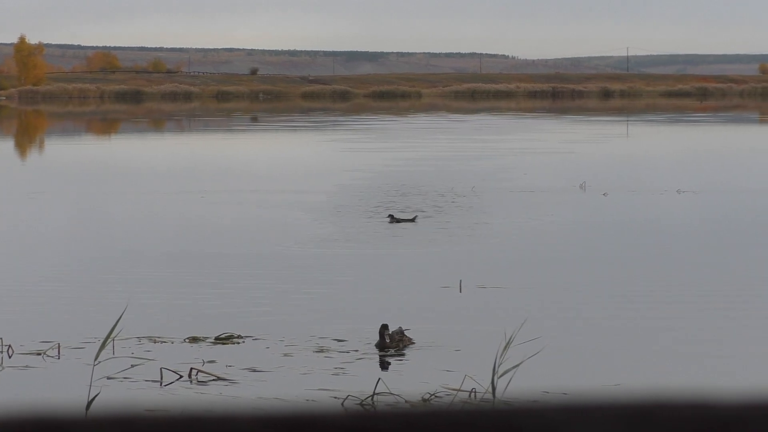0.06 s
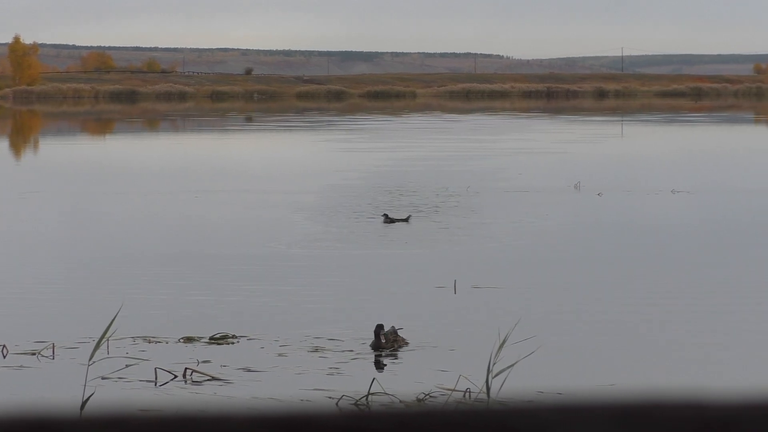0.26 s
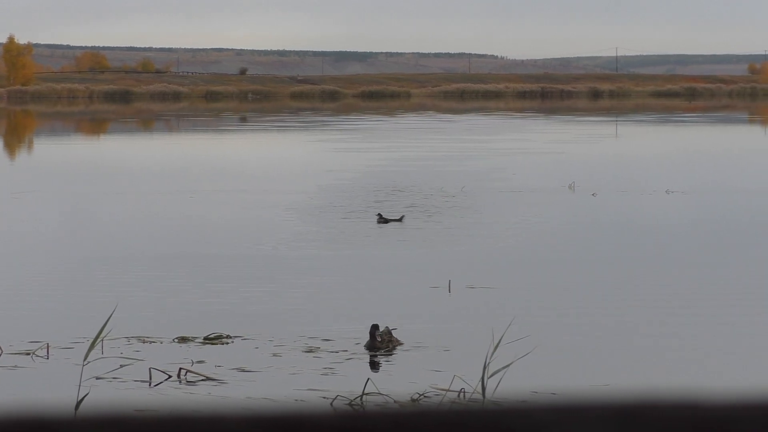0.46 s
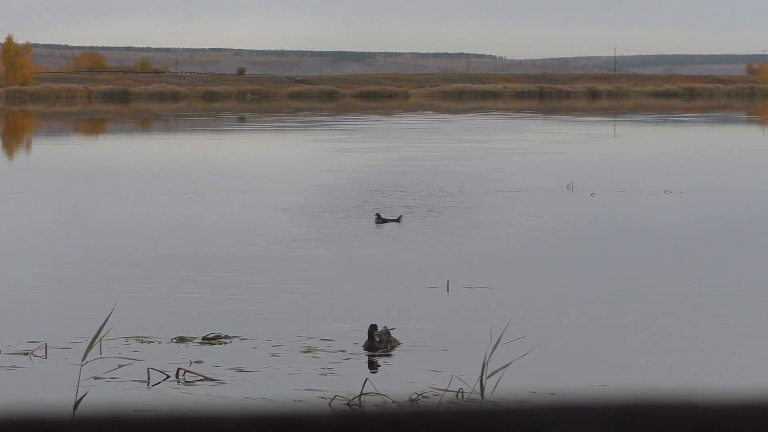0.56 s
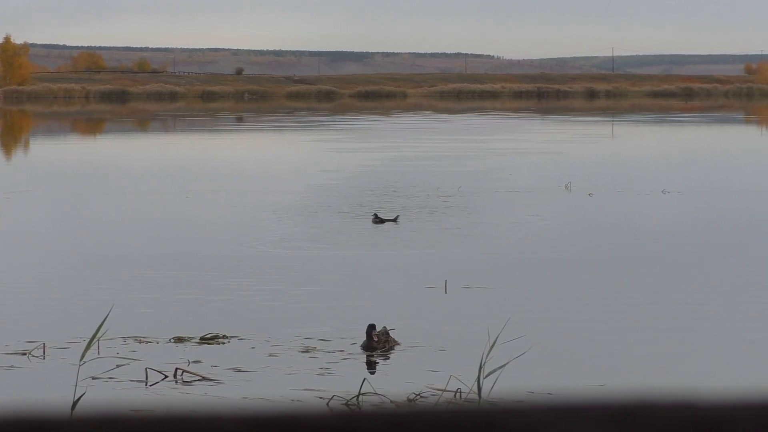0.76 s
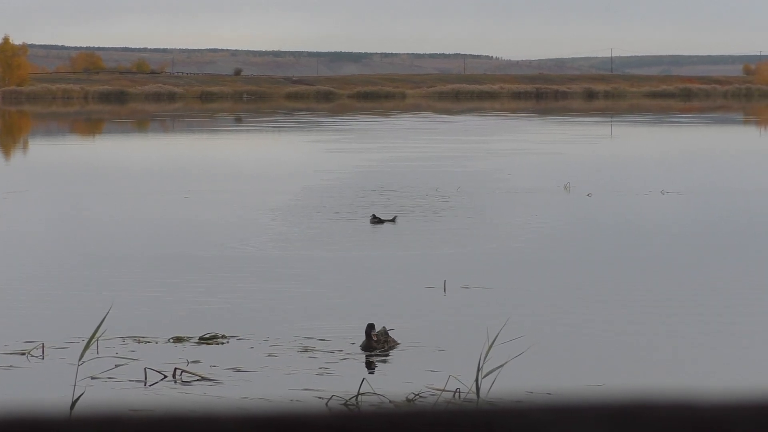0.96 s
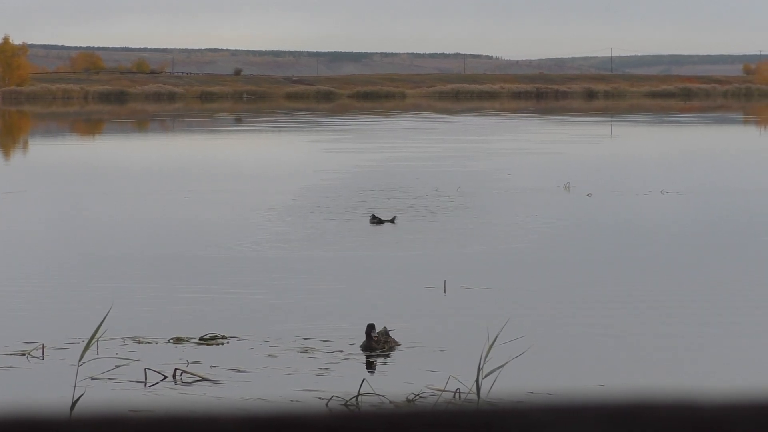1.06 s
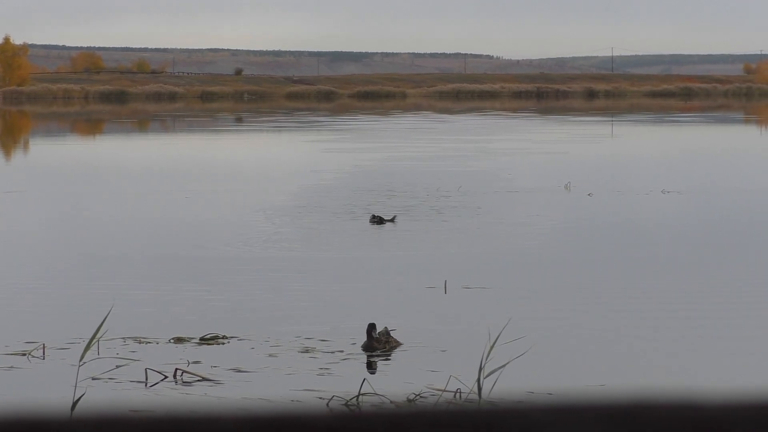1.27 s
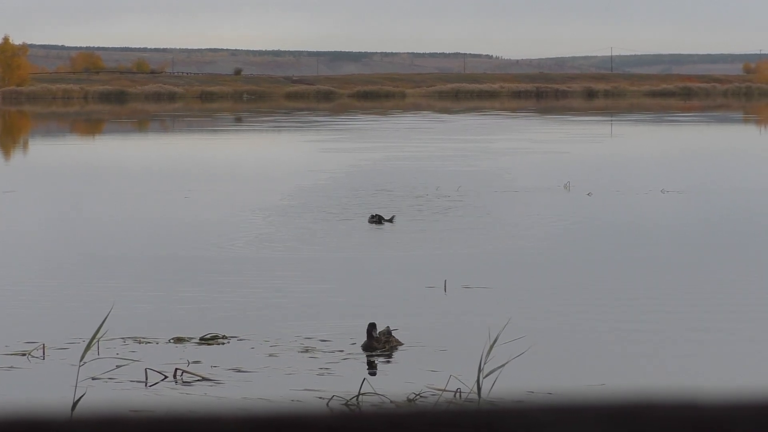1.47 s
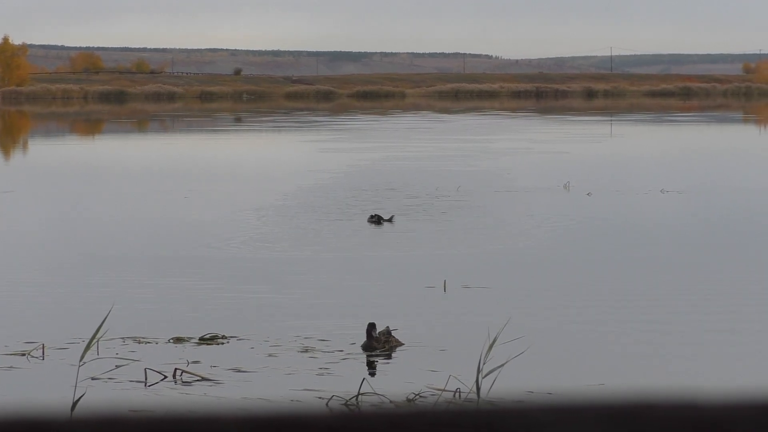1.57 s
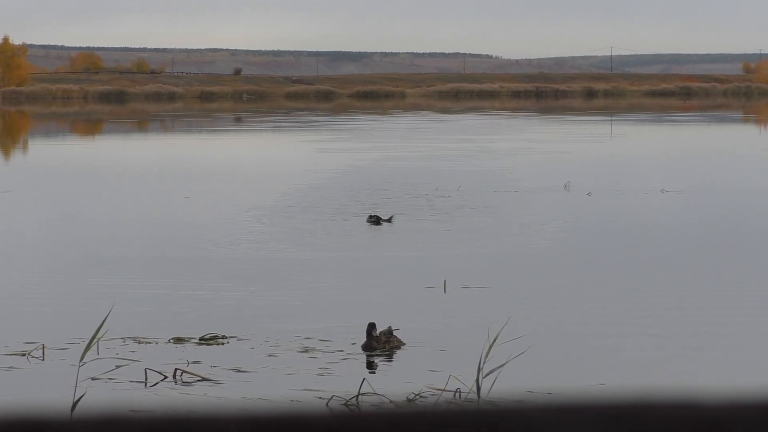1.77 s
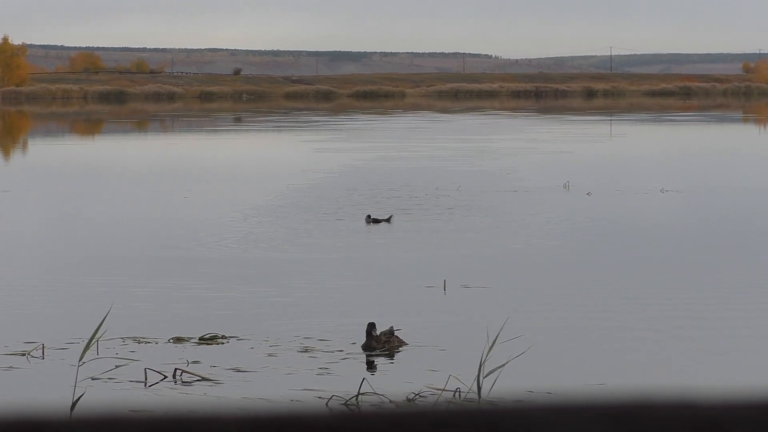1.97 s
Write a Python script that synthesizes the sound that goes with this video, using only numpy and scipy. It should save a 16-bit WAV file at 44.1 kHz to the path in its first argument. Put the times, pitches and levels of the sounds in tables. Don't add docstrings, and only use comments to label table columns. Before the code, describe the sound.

A duck gives two loud, buzzy nasal quacks, each a third of a second and rising in pitch, at 0.25 and 1.22 seconds. A very faint grunt precedes them at the start. Gear knocks and rattles beside the microphone from 0.9 to 1.25, cloth rustles from 1.6, a sharp double-click snap lands at 1.78, and a faint touch at 1.96. Soft air hiss and lapping water lie beneath, outdoors.

```python
import sys
import numpy as np
from scipy import signal
from scipy.fft import rfft, irfft
from scipy.io import wavfile
from scipy.ndimage import uniform_filter1d, minimum_filter1d

SR = 44100
rng = np.random.default_rng(int(sys.argv[2]) if len(sys.argv) > 2 else 0)


def pcm_store(signal):
    levels = np.round(np.clip(np.atleast_2d(signal), -1, 1) * 32767)
    wavfile.write(sys.argv[1], SR, levels.astype(np.int16).T)


def boost(x):
    u = np.asarray(x, float) / 20
    return 10 ** u


N = 89302

# [t/s, level/dB, pulse rate f/Hz, roughness 0-1, bill opening/dB per octave, flap imbalance/dB, nose/dB]
QUACKS = [
    [(.232, -43, 117.2, 0.35, -10.5, 3.5, -2.5), (.276, -18.5, 157.3, 0.26, -3.5, 6.5, -5.5),
     (.296, -11.5, 165.6, 0.2, -1, 0, 0.5), (.34, -10, 188.4, 0.17, -0.5, 5.5, 5),
     (.372, -8, 200.2, 0.22, -1, -1.5, -31), (.43, -10, 206.3, 0.16, -0.6, 0.8, -22),
     (.499, -11, 209.3, 0.04, -0.5, 2.5, -12), (.509, -3, 210.4, 0.57, -1, -8, 3.5),
     (.552, -40.5, 210.7, 0.6, -4.5, -15, 1)],
    [(1.224, -24.5, 129, 0.18, -6.5, 1.5, -0.5), (1.252, -17.5, 144, 0.42, -1.5, 8.5, 2.5),
     (1.28, -10, 170.8, 0.15, -1.5, 1.4, 0.5), (1.32, -11.5, 187.7, 0.19, -2, 6, 9.5),
     (1.345, -8, 197.7, 0.14, -1.6, 3, -3.5), (1.385, -8.5, 205.9, 0.17, -2.3, 3.5, -28),
     (1.488, -7, 214.4, 0.2, -1.9, 2, -16), (1.499, -3, 207.1, 0.63, -3, -8.5, 3),
     (1.542, -44, 197.2, 0.3, -2, -13.5, -8)],
]
FLAP_DB = [-16, 4.5, -19, 0.5, -7, 5.5, 8.5, 9, 12, 8, 10.5, 3, 3, 2.5, -0.5, -1, 0.5, -2.5, 0.5, 3, 1, -10,
           4.5, -3.5, -0.5, 1.5]
# [f/Hz, width/Hz, level/dB]
BILL = [(446, 220, -20), (843, 270, -38), (1061, 383, -11), (1603, 357, -4.5), (2100, 415, 3.5),
        (2482, 322, 2), (3110, 640, -10.5), (4910, 110, -23.5), (5400, 420, -56), (7020, 620, -28),
        (7960, 4500, -71.5)]
# [f/Hz, width/Hz]
NULLS = [(900, 110), (1255, 107), (1700, 213), (2035, 163), (2325, 124), (2730, 210), (3130, 130),
         (3400, 61), (3750, 93), (4100, 210)]


def quacks():
    even_loss_db = -7.5
    higher = [even_loss_db * (k % 2) for k in range(28)]
    weights_db = list(FLAP_DB) + higher
    calls = 0
    for table in QUACKS:
        db, hz, rough, open_db, odd_db, nose_db = in_time(table)
        calls = calls + voice(db, hz, rough, weights_db, BILL, open_db, odd_db, nose_db, NULLS)
    return boost(3.5) * calls


# [t/s, level/dB, pulse rate f/Hz, roughness 0-1, bill opening/dB per octave]
GRUNT = [
    (.01, -53.5, 289, 0.8, 2.5),
    (.022, -33, 290.5, 0.66, -4),
    (.034, -30, 294.4, 0.53, 1.7),
    (.058, -32, 295, 0.53, 1),
    (.075, -25.5, 325, 0.76, -2.5),
    (.098, -56, 327, 0.8, 0.5),
]
# [f/Hz, width/Hz, level/dB]
GRUNT_THROAT = [(379, 200, -2.5), (805, 530, 1.5), (1350, 284, 4.5), (2240, 70, 0), (3070, 240, 0.5)]
GRUNT_FLAP_DB = [4, -1.5, 1, 1, 6, 8, 4.5, 2.2, 1.5, 1.5, -2.8, -3]


def grunt():
    db, hz, rough, open_db = in_time(GRUNT)
    return voice(db, hz, rough, GRUNT_FLAP_DB, GRUNT_THROAT, open_db)


# [f/Hz, width/Hz, level/dB]
NOSE = [(517, 290, -31.5), (1156, 184, -19.5), (2840, 380, -12), (3390, 390, -13), (4820, 700, -25.5)]


def voice(level_db, hz, rough, weights_db, throat, open_db=0, odd_db=0, nose_db=-99, nulls=()):
    jitter, spread_rad, blur_rad, flutter_db = .025, 0.066, 3.0, 3.0
    breath_db, shimmer_db, top_hz, null_depth = 9.0, 6.0, 9750, 0.99
    rough = np.clip(rough, 0, 1)
    phase = 2 * np.pi * np.cumsum(hz * (1 + jitter * rough * drift(82))) / SR
    flutter = [flutter_db * drift(26) for _ in range(5)]
    blur = [blur_rad * (rough + .04) * drift(90) for _ in range(5)]
    pulses = 0
    for k, weight_db in enumerate(weights_db, 1):
        tilt_db = open_db * np.log2(k * hz / 1900)
        flutter_now = flutter[k % 5] * min(k / 24, 1) ** 2
        db = weight_db + tilt_db + odd_db * (k % 2) + flutter_now
        angle = k * phase + spread_rad * k * k + blur[k % 5] * min(k / 22, 1) ** 3
        pulses = pulses + boost(db) * np.cos(angle) * (k * hz < top_hz)

    puffs = np.diff(rng.standard_normal(N + 1)) * (1 + np.cos(phase))
    breath = puffs * boost(breath_db + 0.73 * open_db)
    shimmer = boost(shimmer_db * rough * np.tanh(drift(130)))
    source = pulses * (1 - rough) * shimmer + rough * breath

    mouth = body(source * boost(level_db), throat)
    for null_hz, width in nulls:
        mouth = mouth - null_depth * peak(mouth, null_hz, width, 0)
    nose = body(source * boost(level_db + nose_db), NOSE)
    loud = level_db > level_db.max() - 6
    return (mouth + nose) / np.std(body(source, throat)[loud])


def ducks():
    echo_s, echo_db = .011, -13.5
    reeds_db, reeds_t60_s, reeds_side = -33, .55, .15
    calls = quacks() + grunt()
    bounce = np.interp(np.arange(N) - echo_s * SR, np.arange(N), calls)
    t = np.arange(SR) / SR
    reeds = rng.standard_normal((2, SR)) * boost(-60 * t / reeds_t60_s) * (t > .02)
    reeds = reeds / np.sqrt(np.sum(reeds[0] ** 2))
    mid, side = signal.fftconvolve(calls[None], reeds, axes=1)[:, :N]
    tail = mid + reeds_side * side * [[1], [-1]]
    return ports(calls + boost(echo_db) * bounce) + boost(reeds_db) * tail


# [t/s, peak level/dB, thump/dB, brightness/dB, rattle T60/s]
KNOCKS = [
    (0.903, -31, 0, -14, 0.12),
    (0.913, -17.5, -4.5, -22, 0.043),
    (0.959, -24, -14.5, 8.5, 0.04),
    (0.988, -17, -28, 1, 0.11),
    (1.070, -20, -24, -6.5, 0.044),
    (1.121, -30.5, -14, 5.5, 0.069),
    (1.152, -15, -29.5, 3.5, 0.11),
    (1.192, -37.5, -1, -9, 0.13),
    (1.229, -22, -28, -3, 0.079),
    (1.963, -32, -25, -2, 0.099),
]
# [f/Hz, width/Hz, level/dB]
GEAR = [(232, 14, -16), (1037, 64, 7), (1570, 96, 4), (1820, 170, 2.7), (2380, 410, -2.5),
        (3130, 740, -4.5), (4020, 110, -13), (5550, 530, -6.5), (8100, 1600, -12), (10600, 14000, -21.5)]
# [f/Hz, width/Hz, level/dB]
PUSH = (200, 280, -1.4)
# [f/Hz, width/Hz, level/dB]
HULL = [(220.7, 7.7, 8.5), (431, 28, 5), (1077, 22, 3)]


def knocks():
    attack_s, rattle_db, rattle_slow = 0.0025, -14.5, 7.7
    strike_db, strike_s = 15.5, .0015
    out, t = 0, np.arange(N) / SR
    grit = rng.standard_normal((len(KNOCKS), N)) * boost(0.75 * drift(260))
    for (s, db, thump_db, bright_db, t60), noise in zip(KNOCKS, grit):
        age = np.maximum(t - s, 0)
        burst = boost(-60 * age / t60)
        rattle = boost(rattle_db - 60 * age / t60 / rattle_slow)
        contacts = noise * np.minimum(age / attack_s, 1) * (burst + rattle)
        strike = boost(strike_db) * (np.arange(N) == int((s + strike_s) * SR))
        hit = (contacts + strike) * boost(db + 1.0)
        thump = peak(hit, *GEAR[0]) + peak(peak(hit, *PUSH), *PUSH)
        case = body(hit, HULL) + body(hit, GEAR[1:6])
        bright = body(hit, GEAR[6:])
        out = out + boost(thump_db + 14.5) * thump + case + boost(bright_db) * bright
    return out + sway(grit[0])


def sway(grit):
    start_s, level_db, t60_s = .93, -22.5, 0.85
    t = np.arange(N) / SR
    shaking = (t > start_s) * (t < KNOCKS[6][0])
    shake = grit * shaking * boost(level_db - 60 * np.abs(t - start_s) / t60_s)
    once = peak(shake, hz=124, width=150, db=0.1)
    return peak(once, hz=124, width=150, db=0.1)


# [t/s, level/dB]
SNAP = [
    (1.7823, -3.5),
    (1.7850, -3.5),
    (1.7873, -5.5),
    (1.7962, -24),
    (1.803, -38),
    (1.804, -35),
]
# [f/Hz, width/Hz, level/dB]
SNAP_BODY = [(355, 160, -15), (1080, 270, -8), (1640, 426, 3.5), (2300, 690, 1.5), (3240, 560, -2.5),
             (4770, 1600, -17), (7500, 3300, -20.5)]


def snap():
    tail_db, tail_t60_s = -2, .065
    s, db = np.transpose(SNAP)
    clicks = np.zeros(N)
    clicks[(s * SR).astype(int)] = boost(db + 23) * (-1) ** np.arange(len(s))
    age = np.arange(N) / SR - s[0]
    tail = rng.standard_normal(N) * (age > 0) * boost(tail_db - 60 * np.abs(age) / tail_t60_s)
    return body(clicks + tail, SNAP_BODY)


# [t/s, level/dB]
RUSTLE = [
    (1.59, -54.5),
    (1.65, -40.5),
    (1.7, -32.5),
    (1.745, -28),
    (1.78, -34.5),
    (1.82, -43),
    (1.89, -41),
    (1.94, -49),
    (2.03, -43.5),
]
# [f/Hz, level/dB per Hz]
CLOTH = [(59, -50), (100, -21.5), (365, -1.5), (676, -17), (736, -7.5), (1800, -4), (5300, -12.5),
         (5770, -21), (16000, -27)]
# [f/Hz, correlation]
CLOTH_LIKENESS = [(60, 0.96), (240, 1.0), (950, 0.98), (3770, 0.84), (15000, -0.046)]


def cloth():
    return boost(in_time(RUSTLE)[0]) * banded_noise(CLOTH, CLOTH_LIKENESS, patchy_db=1.9, rate=150)


# [f/Hz, level/dB per Hz]
AIR = [(15, -63), (25, -60), (70, -20), (185, -37.5), (285, -14), (560, -34), (1330, -7.5), (1790, -17),
       (16000, -24.5)]
# [t/s, level/dB]
AIR_LEVEL = [(0, -47.5), (.6, -52), (.85, -54), (.95, -51.5), (1.5, -53.5), (2.03, -49.5)]
# [f/Hz, correlation]
LIKENESS = [(60, 0.77), (180, 0.94), (550, 0.48), (1650, 0.91), (4970, 0.3), (15000, -0.91)]


def air():
    return boost(in_time(AIR_LEVEL)[0]) * banded_noise(AIR, LIKENESS, patchy_db=1.5, rate=64)


# [f/Hz, level/dB per Hz]
LAPPING = [(24, -67), (40, -34), (214, -9.5), (327, -8), (369, -10), (898, -14), (5000, -25), (6500, -70),
           (11000, -120)]
# [t/s, level/dB]
LAPPING_LEVEL = [(0, -47.5), (.25, -45), (.6, -54), (.88, -55.5), (1.0, -48), (1.5, -44.5), (2.03, -88)]


def water():
    return boost(in_time(LAPPING_LEVEL)[0]) * banded_noise(LAPPING, CLOTH_LIKENESS, patchy_db=1.3, rate=18)


def banded_noise(spectrum, likeness, patchy_db, rate):
    out, together = 0, drift(rate)
    edges = 25 * 2 ** np.arange(0, 9.6, .5)
    white = rng.standard_normal((2, 2, N))
    for k, (low, high) in enumerate(zip(edges, edges[1:])):
        band = signal.butter(2, [low, high], "band", fs=SR, output="sos")
        mid, side = signal.sosfilt(band, white[k % 2])
        hz = np.sqrt(low * high)
        alike = np.clip(at_hz(likeness, hz), 0, 1)
        flicker_db = patchy_db * (.6 * together + .8 * drift(rate))
        stereo = np.sqrt(1 + alike) * mid + np.sqrt(1 - alike) * side * [[1], [-1]]
        out = out + boost(at_hz(spectrum, hz) + flicker_db) * stereo
    return rms_one(out)


# [f/Hz, lead/rad]
PORT_LEAD = [(10, .1), (500, 0.055), (1200, 0.096), (2500, 0.35), (4500, 0.42), (7300, 1.68), (11000, 2.36),
             (16000, 2)]


def ports(x):
    turn = np.exp(.5j * at_hz(PORT_LEAD, np.fft.rfftfreq(N, 1 / SR)))
    wave = rfft(x * np.ones((2, 1)))
    return irfft(wave * [turn, turn.conj()], N)


def peak(x, hz, width, db):
    r = np.exp(-np.pi * width / SR)
    zeros = [(1 - r * r) / 2, 0, (r * r - 1) / 2]
    poles = [1, -2 * r * np.cos(2 * np.pi * hz / SR), r * r]
    return boost(db) * signal.lfilter(zeros, poles, x + 1e-18)


def body(x, table):
    return sum(peak(x, *row) * (-1) ** k for k, row in enumerate(table))


def drift(rate):
    r = np.exp(-2 * np.pi * rate / SR)
    white = rng.standard_normal(N + SR)
    return rms_one(signal.lfilter([1], [1, -2 * r, r * r], white)[SR:])


def rms_one(x):
    return x / np.sqrt(np.mean(x ** 2) + 1e-20)


def in_time(rows):
    s, level, *rest = np.transpose(rows)
    t = np.arange(N) / SR
    return [np.interp(t, s, level, left=-140, right=-140)] + [np.interp(t, s, c) for c in rest]


def at_hz(points, hz):
    f, value = np.transpose(points)
    return np.interp(np.log(hz + 1), np.log(f), value)


def scene():
    handling = knocks() + snap() + cloth()
    return ducks() + ports(handling + air()) + water()


def top_cut(x):
    return signal.sosfilt(signal.butter(12, 16500, fs=SR, output="sos"), x)


def record(dry):
    ceiling, release_s = .97, .004
    span = int(release_s * SR)
    room = np.minimum(ceiling / (np.abs(dry).max(axis=0) + 1e-9), 1)
    gain = uniform_filter1d(minimum_filter1d(room, size=2 * span), size=span)
    low_pass = signal.cheby2(10, 40, 16100, fs=SR, output="sos")
    mix = signal.sosfiltfilt(low_pass, dry * gain)
    return top_cut(mix)


dry = scene()
out = record(dry)
pcm_store(out)
```